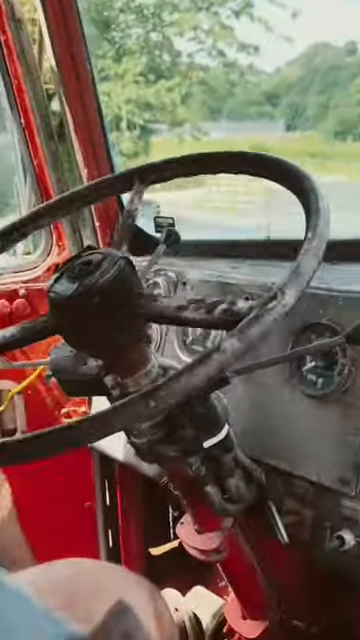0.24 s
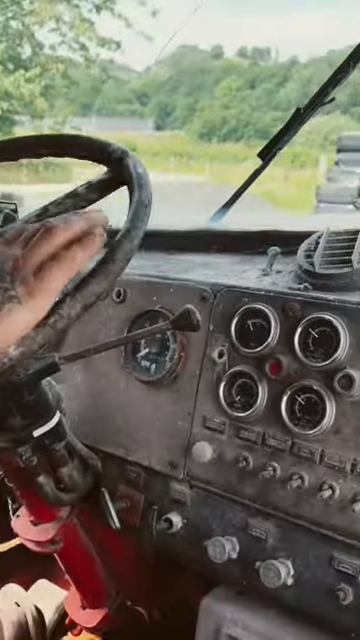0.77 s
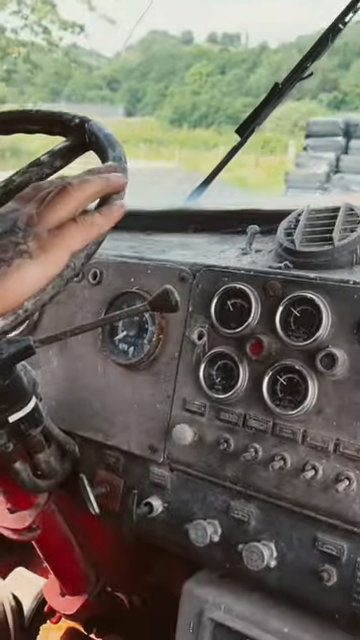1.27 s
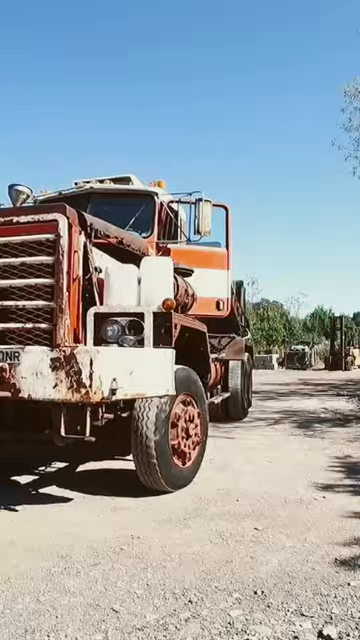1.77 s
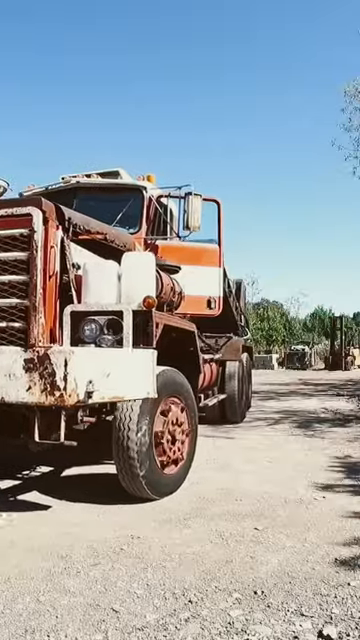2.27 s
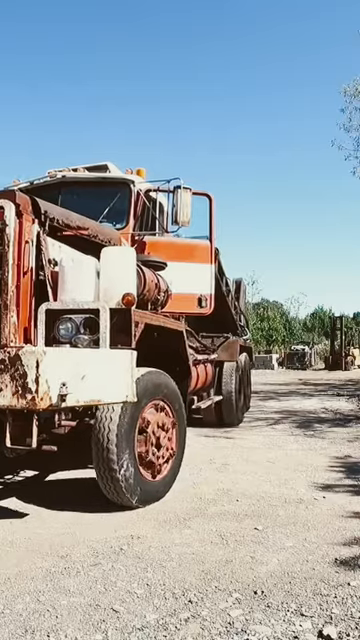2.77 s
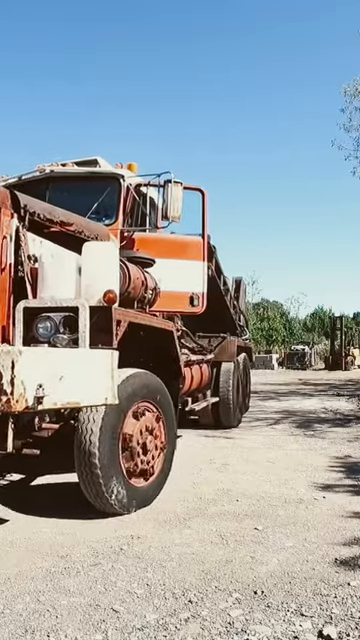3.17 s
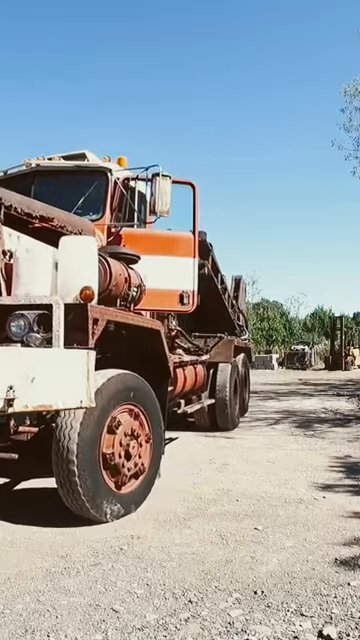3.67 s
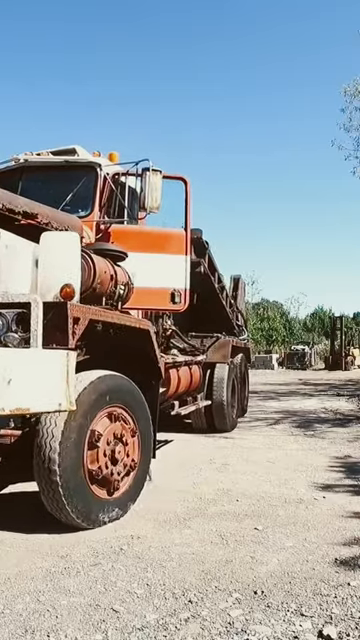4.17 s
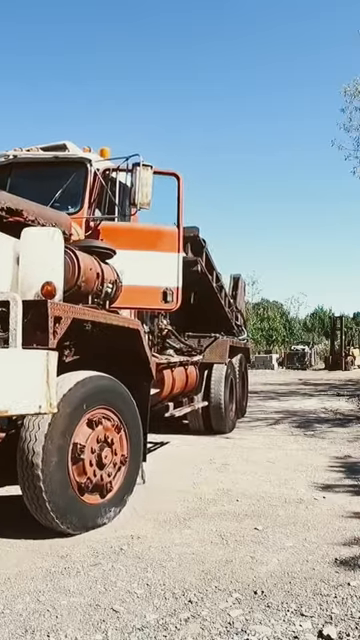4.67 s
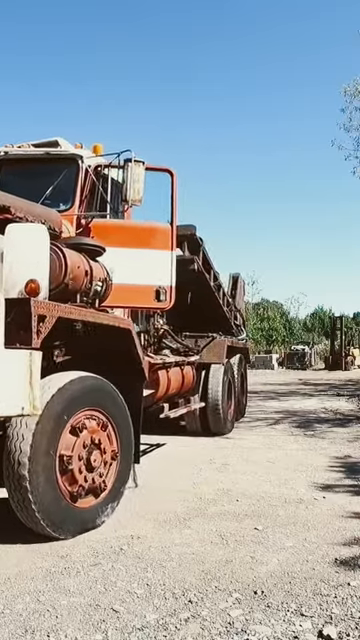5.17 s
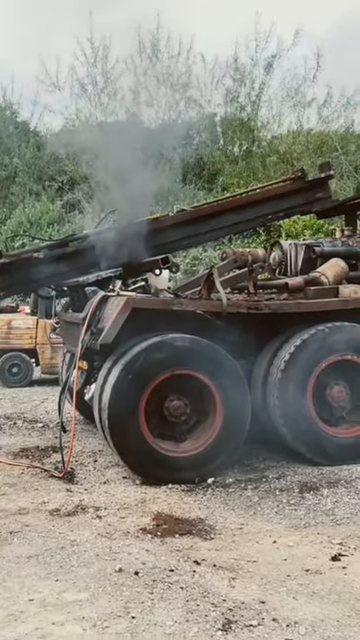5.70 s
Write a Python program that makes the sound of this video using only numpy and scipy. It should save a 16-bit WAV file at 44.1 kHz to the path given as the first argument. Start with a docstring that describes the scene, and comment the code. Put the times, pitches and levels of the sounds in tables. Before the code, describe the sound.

Booming diesel cab noise with thumping panels cuts to a clattering, whining truck engine outdoors that slows to a lumpy idle, then a faint distant idle.

```python
"""A six-cylinder drone sags and picks up in a truck cab while panels buzz, thump and clink.
Then a V8 runs at fast idle in the yard, gears whining, drops to slow idle, and is last heard faintly from behind.
Firing tones and cycle-locked noise bursts through resonances make the engines; gear whine is tones at multiples
of the cycle; loose parts are short decaying rings. All turning parts follow speed curves."""
import sys
import numpy as np
from scipy import signal
from scipy.fft import rfft, irfft
from scipy.io import wavfile
from scipy.ndimage import uniform_filter1d

SR = 44100
rng = np.random.default_rng(int(sys.argv[2]) if len(sys.argv) > 2 else 0)


def unload_audio(sound):
    """Save the sound as a 16-bit wav file, at the path given as the first command line argument."""
    columns = np.transpose(np.atleast_2d(sound))
    # keep every value between -1 and 1, then stretch to whole-number steps
    steps = np.round(np.clip(columns, -1, 1) * 32767)
    wavfile.write(sys.argv[1], SR, steps.astype(np.int16))


N = 261937
T = np.arange(N) / SR
HZ = np.fft.rfftfreq(N, 1 / SR)
YARD_START_S, YARD_END_S = 1.738, 5.312
EDGE_HZ = 15750  # upper band limit

# engine speed: (time [s], speed [rpm])
CAB_SPEED = [(0.0, 1659.5), (0.2, 1574.3), (0.4, 1436.0), (0.6, 1313.2), (0.75, 1268.1), (0.9, 1331.7),
             (1.05, 1463.6), (1.25, 1636.2), (1.45, 1694.8), (1.72, 1612.4)]
YARD_SPEED = [(1.75, 846), (2.1, 842), (2.45, 841), (2.7, 853), (3.0, 848), (3.3, 866), (3.5, 873),
              (4.06, 877), (4.2, 787), (4.33, 704), (4.5, 605), (4.72, 514), (4.9, 500), (5.3, 497)]

# spectra before scaling to rms 1: (frequency [Hz], relative level [dB per Hz])
CAB_CLATTER_SPECTRUM = [(260, -15), (450, -2), (667, -6), (850, -3), (1600, -6.5), (2120, -12), (3180, -18),
                        (3930, -22), (5000, -27.5), (6500, -60), (11000, -120)]
CAB_RATTLE_SPECTRUM = [(2820, -35), (4800, 6), (5220, 5), (7160, -0.5), (9870, -5.5), (11200, -3.5),
                       (12600, -9), (15600, -11)]
CAB_RUMBLE_SPECTRUM = [(30, -28), (60, -28), (85, -2.5), (108, 5.5), (122, 6), (136, -12.5), (160, 0),
                       (190, -7.5), (220, -17.5), (280, -17.5), (500, -32), (1500, -110)]
CAB_PANEL_SPECTRUM = [(120, -58), (200, -12.5), (270, -9.5), (330, 5), (400, 1.5), (460, -14.5), (650, -57),
                      (1500, -100)]
FAST_CLATTER_SPECTRUM = [(82, -61.5), (140, -2), (200, -11.5), (275, -8.5), (390, -9.5), (490, -14),
                         (680, -7.5), (900, -8), (1130, -2), (1410, -15.5), (1880, -12.5), (2470, -26.5),
                         (2850, -31), (3230, -22.5), (3650, -37), (4840, -40), (7700, -55.5), (10300, -64),
                         (17400, -120)]
SLOW_CLATTER_SPECTRUM = [(82, -54), (166, -4), (366, -7.5), (578, -9.5), (672, -8.5), (823, -4),
                         (1150, 0.5), (1440, -10.5), (2010, -12.5), (2420, -27), (3300, -28), (5700, -44.5),
                         (6350, -44), (7900, -55), (10300, -62.5), (17400, -120)]
TICKING_SPECTRUM = [(1500, -42.5), (2500, -4), (3250, -1), (4000, -8), (4950, -0.5), (5600, -10),
                    (7700, -14.5), (8300, -36.5), (13000, -59.5)]
PIPE_SPECTRUM = [(10, -20.5), (30, 5.5), (45, 10.5), (57, -4), (90, 4.5), (160, -8.5), (280, -7.5),
                 (600, -34.5), (1500, -80)]
REAR_SPECTRUM = [(15, -44), (25, -18), (71, 2), (200, -1), (462, -8.5), (856, -1.5), (1420, -9),
                 (2560, -22), (9770, -34.5), (11200, -33), (15000, -46)]
DIFFUSE_SPECTRUM = [(300, -55.5), (600, -1.0), (2000, -14.5), (5000, -24.5), (8000, -43.5)]

# small loose metal parts in the cab: (time [s], relative level [dB])
CAB_CLINKS = [(0.0882, -30), (0.1748, -23), (1.081, -31), (1.2406, -26)]
# loose cab panel: (time [s], envelope peak [dB])
PANEL_THUMPS = [(0.08, -14), (0.286, -10.5), (0.335, -17), (0.452, -20), (0.756, -14.5), (0.782, -11),
                (0.962, -15), (0.996, -10), (1.176, -20), (1.203, -10), (1.225, -13), (1.248, -12),
                (1.347, -10.5), (1.398, -7.5), (1.538, -14), (1.586, -11.5)]
# dash metal buzz: (time [s], half length [s], added drive level [dB])
DASH_SWELLS = [(0.08, 0.067, -38.5), (0.36, 0.021, -38), (1.155, 0.037, -38), (1.245, 0.018, -33),
               (1.441, 0.015, -30.5)]
# floor drumming at twice the firing rate: (time [s], half length [s], level [dB])
FLOOR_DRUMMING = [(0.118, .012, -20), (0.16, .016, -14), (0.348, 0.018, -17), (1.261, 0.03, -18),
                  (1.474, 0.0087, -16), (1.67, 0.02, -21.5)]
# cab gear whine: (time [s], relative level [dB])
CAB_WHINE_LEVEL = [(0, -25.5), (.12, -25.5), (.25, -32.5), (.4, -30), (.46, -47), (1.06, -35),
                   (1.14, -23.5), (1.25, -32.5), (1.46, -26), (1.59, -30.5), (1.66, -32)]
# short ringing bursts outside: (time [s], half length [s], pitch [Hz], level [dB])
RINGING_BURSTS = [(3.938, 0.0088, 4900, -46), (4.032, 0.0027, 1210, -25), (4.637, 0.0044, 905, -22),
                  (4.679, .005, 912, -24), (4.761, 0.0036, 920, -24), (4.787, 0.0043, 1990, -26.5),
                  (5.029, .005, 1060, -23), (5.061, 0.011, 1960, -29.5), (5.244, 0.014, 4900, -47),
                  (5.694, .003, 900, -52)]

# engine block and covers: (frequency [Hz], width [Hz], gain over the clatter [dB])
BLOCK_RINGS = [(263.5, 17, -10), (4720, 380, 4.5), (6900, 1600, -0.5)]
# V8 cylinders in firing order: (strength [dB], lag [share of firing interval])
CYLINDER_PUFFS = [(-3, 0.765), (2.5, 0.512), (2.5, 0.514), (0, 0.523), (0, 0.568), (-4.5, 0.46),
                  (1.5, 0.508), (2.5, 0.651)]
# gear mesh sidebands: (multiple of cycle [-], relative level at grille [dB], relative level beside wing [dB])
MESH_SIDEBANDS = [(146, -14, -9), (152, -1, -5), (156, -1, -10), (162, 2, -3), (164, 0, -12),
                  (166, -2, -12), (168, -3, 2), (172, -9, -11)]
# yard gear whine: (time [s], mesh tone level [dB], sideband level [dB])
YARD_WHINE_LEVEL = [(2.0, -30, -31), (2.17, -27.5, -29.5), (2.5, -28, -30.5), (2.75, -31.5, -30),
                    (3.2, -33, -27.5), (3.4, -23, -27.5), (3.62, -23.5, -29), (3.82, -27, -29),
                    (4.05, -28, -28.5), (4.27, -27, -35), (4.4, -33.5, -35), (4.6, -38.5, -36.5),
                    (4.73, -29, -44), (4.9, -34, -40)]
# fan, pump and belts at fast idle: (multiple of cycle [-], mean level [dB])
BELT_HUM = [(23, -44), (38, -46), (57, -47)]
# yard stereo level balance: (frequency [Hz], left minus right [dB])
STEREO_BALANCE = [(60, 0.5), (240, 1.5), (480, 3), (950, 6.5), (1890, 2), (3770, 6.5), (7520, -4.5)]
# yard stereo phase: (frequency [Hz], left lead over right [rad])
STEREO_LEAD = [(0, -0.0068), (1640, 0.11), (2670, -1.42), (3700, -0.74), (5430, 0.72), (10600, 0.2)]

# cab base levels: (dB at low speed, dB at high speed, dB added at full pull); DRONE is at high speed from the knee
BOOM, RUMBLE, PANELS = (-11.5, -13.5, 0), (-19.5, -17, 0), (-25.5, -21.5, 0)
CLATTER, RATTLE, DRONE = (-28.5, -25.5, 1), (-47, -43.5, 2), (-22.5, -13, 1.4)
LOW_RPM, KNEE_RPM, HIGH_RPM, FULL_PULL_RPM_PER_S = 1270, 1490, 1690, 900
SHUDDER_CYCLES, SHUDDER_FIRST = 2.614, 1.45  # engine cycles per shudder, cycles at the first
SHUDDER_DB, SHUDDER_WIDTH = 1.5, 0.37  # panel lift; half length as share of the beat
BOOM_SWING_DB, BOOM_LEAD = 1.5, 0.283  # boom swells ahead of the shudder (share of the beat)
SURGE_DB, SURGE_SWING_DB = -18, 8.5  # order 8, at high speed
THUMP_RISE_S, THUMP_HZ, THUMP_SPREAD = 0.0044, 364, 0.022
DASH_DB, DASH_HZ, DASH_PULL_HZ = -44, 3200, 246  # constant drive level; pitch, and its rise at full pull
CAB_OCTAVE_DB = -9  # relative to the mesh tone

PIPE_FAST_DB, PIPE_SLOW_DB, PIPE_DB_PER_S = -15.5, -21, -0.51  # base levels; fades along the walk
PIPE_DROP_RPM, PIPE_DROP_WIDTH_RPM = 702, 9.9  # below this the puffs stop driving the pipe hard
CLATTER_FAST_DB, CLATTER_SLOW_DB, CLATTER_COAST_DB = -35, -36, -2.5  # base levels; added at full slowing
CATCH_S, CATCH_HALF_S, CATCH_DB = 5.13, 0.28, 3.2  # clatter swells as the governor catches the idle
CATCH_THUD_DB = -30.5
COVER_HZ, COVER_WIDTH_HZ, COVER_DB, COVER_FROM_S = 911, 49, -35, 2.9
TICKING_DB, ARCH_S, ARCH_HALF_S, ARCH_DB = -51.5, 4, 0.35, 4.7  # ticking swells through the wheel arch
WING_S, WING_TURN_S = 3.02, 0.16  # the walk passes from grille to wing
CHATTER_WIDTH = 0.067  # ring width as share of pitch
REAR_DB = -55.5  # gain on the rear mix


def amp(db):
    """Decibels to gain."""
    return 10 ** (np.asarray(db) / 20)


def unit(x):
    """Scales to rms 1."""
    return x / np.sqrt(np.mean(x ** 2) + 1e-20)


def steady(x):
    """Scales to rms 1 over a sliding quarter second or so; the throb stays."""
    return x / np.sqrt(uniform_filter1d(x ** 2, size=12400) + 1e-12)


def curves(rows):
    """Interpolates each column over time."""
    s, *columns = np.transpose(rows)
    return [np.interp(T, s, c) for c in columns]


def read(points):
    """Interpolates a table over log frequency."""
    f, value = np.transpose(points)
    return np.interp(np.log(HZ + 1), np.log(f + 1), value)


def colour(x, points):
    """Filters x by a spectrum table, then scales to rms 1."""
    return unit(irfft(rfft(x) * amp(read(points)), N))


def resonate(x, hz, width):
    """Resonance of gain 1 at its centre, which may follow a curve."""
    turn = np.exp(2j * np.pi * np.cumsum(hz * np.ones(N)) / SR)
    r = np.exp(-np.pi * width / SR)
    return 2 * (turn * signal.lfilter([1 - r], [1, -r], x / turn)).real


def wander(hz):
    """Low-passed noise, rms 1."""
    lowpass = 1 + (np.fft.rfftfreq(8192, .001) / hz) ** 4
    slow = irfft(rfft(rng.standard_normal(size=8192)) / lowpass)
    return unit(np.interp(T * 1000, np.arange(len(slow)), slow))


def swell(at, half):
    """Gaussian bump of height 1; half is the time to 1/e."""
    return np.exp(-((T - at) / half) ** 2)


def section(start, end, fade_in, fade_out):
    """Opens and shuts one section with short fades."""
    return np.clip((T - start) / fade_in, 0, 1) * np.clip((end - T) / fade_out, 0, 1)


def crank(rpm):
    """Four-stroke cycles per second, and cycles turned so far."""
    rate = rpm / 120
    return rate, np.cumsum(rate) / SR


def speeding(rpm):
    """Smoothed speed change in rpm per second."""
    return uniform_filter1d(np.gradient(rpm, T), size=6000)


def follow(law, speed, pull):
    """Level in dB from speed and pull."""
    low_db, high_db, pull_db = law
    return low_db + (high_db - low_db) * speed + pull_db * pull


def tone(cycles, order, lag=0):
    """Sine at a multiple of the engine cycle, rms 1."""
    return np.sqrt(2) * np.cos(2 * np.pi * (order * cycles - lag))


def knocks(cycles, count, lag, decay, bed, repeat, spread_db, size=8192):
    """Decaying noise bursts, count a cycle; the power share 'repeat' is alike in every cycle."""
    same = rng.standard_normal(size=size)
    repeat = np.clip(repeat, 0, 1)
    repeated = np.sqrt(repeat) * same[(cycles % 1 * len(same)).astype(int)]
    noise = repeated + np.sqrt(1 - repeat) * rng.standard_normal(N)
    beat, age = np.divmod(count * cycles - lag + 2, 1)
    force = amp(spread_db * rng.standard_normal(size=1024))[beat.astype(int)]
    return unit(noise * (bed + force * np.exp(-age / decay)))


def rear():
    """Idle from far behind: dull clatter, soft firing tones and one ringing cover."""
    rate, cycles = crank(np.full(N, 480.))
    hits = knocks(cycles, count=8, lag=0.22, decay=0.61, bed=2.1, repeat=0.38, spread_db=2)
    firing = amp(-16) * tone(cycles, order=8) + amp(-14) * tone(cycles, order=16)
    cover = amp(-32) * unit(resonate(hits, 1000, 16))
    return amp(REAR_DB) * (amp(1.5) * colour(hits, REAR_SPECTRUM) + firing + cover)


def chatters():
    """Short noise bursts, each ringing at one pitch."""
    noise, out = rfft(rng.standard_normal(N)), np.zeros(N)
    for s, half, hz, db in RINGING_BURSTS:
        shape = swell(s, half)
        burst = shape * irfft(noise * np.exp(-((HZ / hz - 1) / CHATTER_WIDTH) ** 2), N)
        out += amp(db) * burst * np.linalg.norm(shape) / np.linalg.norm(burst)
    return out


def clinks():
    """Decaying noise in two resonances: small metal parts ring briefly."""
    blows = sum(amp(db - 15) * (T > s) * np.exp(-abs(T - s) / 0.014) for s, db in CAB_CLINKS)
    noise = rng.standard_normal(N)
    return blows * unit(resonate(resonate(noise, 7300, 2200), 9200, 5000))


def thumps():
    """Each blow rings the panel for a few cycles."""
    out = np.zeros(N)
    for s, db in PANEL_THUMPS:
        age = np.maximum(T - s, 0)
        hz = THUMP_HZ * (1 + THUMP_SPREAD * rng.standard_normal())
        envelope = age / THUMP_RISE_S * np.exp(1 - age / THUMP_RISE_S)
        out += amp(db) * envelope * np.sin(2 * np.pi * hz * age)
    return out


def singing(cycles, clatter_db):
    """High engine orders flare briefly in the clatter and glide with speed."""
    streaks = sum(amp(6 * wander(12)) / k * tone(cycles, order=k, lag=.2 * wander(20))
                  for k in range(98, 180, 7))
    return amp(clatter_db - 6.5) * steady(streaks)


def cab_gears(cycles):
    """A gear meshes 60 times a cycle; its ragged whine and octave glide with the engine."""
    level_db, = curves(CAB_WHINE_LEVEL)
    play = .13 * wander(18) + .09 * wander(70)
    levels_db = level_db, level_db + CAB_OCTAVE_DB
    return sum(amp(db - 2 + 3.8 * wander(30)) * tone(cycles, order=60 * k, lag=k * play)
               for k, db in enumerate(levels_db, 1))


def cab_boom(rate, cycles, boom_db, speed, swing):
    """Order 9 of the cycle booms near the cab's air resonance; order 8 surges at high speed."""
    near = 1 / np.hypot(1, (9 * rate - 101) / 14)
    boom_db = boom_db + BOOM_SWING_DB * swing - 1.5 + 0.85 * wander(54)
    boom = amp(boom_db) * near * tone(cycles, order=9, lag=0.004)
    surge = tone(cycles, order=8, lag=0.318 + 0.17 * wander(9.2))
    return boom + amp(SURGE_DB + SURGE_SWING_DB * swing) * speed * surge


def dash_metal(cycles, pull):
    """Engine-driven noise rings the dash metal, higher with pull."""
    buzz = knocks(cycles, count=3, lag=.6, decay=.4, bed=.9, repeat=.7, spread_db=2, size=2400)
    drive = amp(DASH_DB) + sum(amp(db) * swell(s, half) for s, half, db in DASH_SWELLS)
    hz = DASH_HZ + DASH_PULL_HZ * pull
    return drive * unit(resonate(resonate(buzz, hz, 300), hz, 700))


def cab():
    """Six firings a cycle drone; speed and pull set the levels, and panels shudder in a slow beat."""
    rpm, = curves(CAB_SPEED)
    rate, cycles = crank(rpm)
    pull = speeding(rpm) / FULL_PULL_RPM_PER_S
    speed = np.interp(rpm, [LOW_RPM, HIGH_RPM], [0, 1])
    to_knee = np.interp(rpm, [LOW_RPM, KNEE_RPM], [0, 1])
    boom_db, panel_db, clatter_db, rattle_db = (
        follow(law, speed, pull) for law in (BOOM, PANELS, CLATTER, RATTLE))
    beat = (cycles - SHUDDER_FIRST) / SHUDDER_CYCLES
    shudder = np.exp(-((beat - np.round(beat)) / SHUDDER_WIDTH) ** 2)
    swing = np.cos(2 * np.pi * (beat + BOOM_LEAD))
    drone_db = follow(DRONE, to_knee, pull) + 1.0 + 1.1 * wander(34)
    drone = amp(drone_db) * tone(cycles, order=6, lag=0.72)
    drumming = sum(amp(db) * swell(s, half) for s, half, db in FLOOR_DRUMMING) * tone(cycles, order=12)
    shake = knocks(cycles, count=6, lag=0.68, decay=0.44, bed=0.77, repeat=0.39, spread_db=1.5)
    rumble = amp(follow(RUMBLE, speed, pull)) * steady(colour(shake, CAB_RUMBLE_SPECTRUM))
    flutter = knocks(cycles, count=3, lag=0.27, decay=0.36, bed=0.34, repeat=0.6, spread_db=1.5, size=2400)
    panels = amp(panel_db - 1.5 + SHUDDER_DB * shudder) * colour(flutter, CAB_PANEL_SPECTRUM)
    # every other firing knocks harder through the bulkhead
    combustion = knocks(cycles, count=3, lag=.68, decay=.32, bed=1.25, repeat=.5, spread_db=1.2, size=2400)
    clatter = amp(clatter_db + 0.7 + 1.04 * wander(23)) * colour(combustion, CAB_CLATTER_SPECTRUM)
    fittings = knocks(cycles, count=3, lag=.7, decay=.28, bed=1.15, repeat=.35, spread_db=2, size=2800)
    rattle = amp(rattle_db + 1.0 * wander(29)) * colour(fittings, CAB_RATTLE_SPECTRUM)
    engine = drone + drumming + cab_boom(rate, cycles, boom_db, speed, swing) + rumble + clatter
    loose = panels + rattle + dash_metal(cycles, pull) + thumps() + clinks()
    return engine + loose + singing(cycles, clatter_db) + cab_gears(cycles)


def valves(cycles, coast):
    """Sixteen tappets a cycle tick unevenly, softer while the engine slows."""
    ticks = knocks(cycles, count=16, lag=.3, decay=.35, bed=.8, repeat=.6, spread_db=3)
    level_db = TICKING_DB + ARCH_DB * swell(ARCH_S, ARCH_HALF_S) + CLATTER_COAST_DB * coast
    return amp(level_db) * colour(ticks, TICKING_SPECTRUM)


def gears(rate, cycles, fast, coast):
    """Timing gears mesh 160 times a cycle; the crank's uneven pull spreads the whine into sidebands."""
    mesh_db, sidebands_db = curves(YARD_WHINE_LEVEL)
    slack = 1 - fast  # unloaded teeth hunt in their backlash
    hunting = slack * (.16 * (1 - .4 * coast) * wander(35) + .09 * tone(cycles, order=2))
    mesh = tone(cycles, order=160, lag=.05 * wander(14) + hunting)
    mesh = steady(mesh * amp((1 + 3 * slack * (1 - coast)) * wander(25)))
    wing = .5 + .5 * np.tanh((T - WING_S) / WING_TURN_S)
    lines = np.zeros(N)
    for k, front_db, side_db in MESH_SIDEBANDS:
        line_db = front_db + (side_db - front_db) * wing + 2 * wander(10)
        lines += amp(line_db) * tone(cycles, order=k, lag=rng.random() + .06 * wander(6))
    mesh_hz = 160 * rate
    teeth = knocks(cycles, count=2, lag=0.079, decay=0.62, bed=0.58, repeat=0.61, spread_db=3.0)
    chatter = steady(resonate(resonate(teeth, mesh_hz, 220), mesh_hz, 300))
    whine = amp(mesh_db) * mesh + amp(sidebands_db) * (steady(lines) + amp(-6.5) * chatter)
    # unloaded teeth rattle; overtones sound as they cross the gear cover's resonance
    second = amp(-32.0) * coast * np.sqrt(slack) * tone(cycles, order=320, lag=.1 * wander(45))
    third_level = amp(-41.0) * slack ** 4 * amp(2 * wander(24))
    third = third_level * tone(cycles, order=480, lag=0.15 * wander(51))
    overtones = resonate(resonate(second + third, 2070, 750), 1920, 1200)
    return whine + overtones


def belts(cycles, fast):
    """Fan, pump and belts hum at fixed multiples of the cycle, fading as the engine slows."""
    return fast ** 3 * sum(amp(db + 5.8 * wander(0.89)) * tone(cycles, order=k, lag=0.21 * wander(10))
                           for k, db in BELT_HUM)


def exhaust(rate, cycles, pipe_db, fast, coast):
    """Eight uneven puffs a cycle ring the pipe; its pitch rises with engine speed as the gas gets hotter."""
    puffs = np.zeros(N)
    for k, (db, lag) in enumerate(CYLINDER_PUFFS):
        turns = np.floor(cycles - (k + lag) / len(CYLINDER_PUFFS))
        puffs += amp(db) * (np.diff(turns, prepend=0) > 0)
    puffs = colour(puffs * amp(0.6 * wander(30)), PIPE_SPECTRUM)
    pipe = resonate(puffs, 114 * (rate / rate.max()) ** 0.13, 21.3)
    # the thud fades while fuel is cut; an octave joins as the governor catches the idle
    thud_db = -25.5 - 4.4 * (0.5 - fast) - 4.4 * coast + 0.5 * wander(15)
    thud = amp(thud_db) * tone(cycles, order=8, lag=0.064)
    octave = amp(CATCH_THUD_DB) * swell(CATCH_S, CATCH_HALF_S) * tone(cycles, order=16)
    return amp(pipe_db - 1.0) * steady(pipe) + thud + octave


def yard(loose):
    """V8 exhaust, gears and combustion clatter, mostly stronger at left; speed drives the levels."""
    rpm, = curves(YARD_SPEED)
    rate, cycles = crank(rpm)
    coast = np.clip(-speeding(rpm) / 550, 0, 1)  # how hard the engine is slowing
    fast = np.clip((rpm - 500) / 340, 0, 1)
    driven = .5 + .5 * np.tanh((rpm - PIPE_DROP_RPM) / PIPE_DROP_WIDTH_RPM)
    pipe_db = PIPE_FAST_DB * driven + PIPE_SLOW_DB * (1 - driven) + PIPE_DB_PER_S * (T - YARD_START_S)
    clatter_db = CLATTER_FAST_DB * fast + CLATTER_SLOW_DB * (1 - fast) + CLATTER_COAST_DB * coast
    clatter_db = clatter_db + CATCH_DB * swell(CATCH_S, CATCH_HALF_S)
    hits = knocks(cycles, count=8, lag=.2, decay=.45, bed=1.7, repeat=.65, spread_db=2)
    hits = hits * amp(0.46 * tone(cycles, order=2, lag=0.58))  # swells once per crank turn
    # a side cover rings once the wheel arch is in line
    ring = steady(resonate(resonate(hits, COVER_HZ, COVER_WIDTH_HZ), COVER_HZ, 97))
    cover = amp(COVER_DB) * np.clip((T - COVER_FROM_S) / 0.045, 0, 1) * ring
    hits = hits + sum(amp(db) * resonate(hits, hz, width) for hz, width, db in BLOCK_RINGS)
    fast_clatter = amp(9.5) * np.sqrt(fast) * colour(hits, FAST_CLATTER_SPECTRUM)
    slow_clatter = amp(8.0) * np.sqrt(1 - fast) * colour(hits, SLOW_CLATTER_SPECTRUM)
    engine = amp(clatter_db) * (fast_clatter + slow_clatter) + cover + valves(cycles, coast)
    engine = engine + gears(rate, cycles, fast, coast) + belts(cycles, fast) + loose
    sound = rfft(engine + exhaust(rate, cycles, pipe_db, fast, coast))
    side = amp(read(STEREO_BALANCE) / 2) * np.exp(.5j * read(STEREO_LEAD))
    # diffuse noise that widens the clatter, opposite in sign at left and right
    diffuse = amp(clatter_db - 12.0) * colour(rng.standard_normal(N), DIFFUSE_SPECTRUM)
    return irfft(np.array([sound * side, sound / side]), N) + np.array([diffuse, -diffuse])


def scene():
    """Cab, yard, rear, one after the other."""
    inside = cab() * section(-1, YARD_START_S, .01, 0.039) ** 0.82
    loose = chatters()
    outside = yard(loose) * section(YARD_START_S, YARD_END_S, 0.04, 0.038) ** 1.28
    behind = (rear() + loose) * section(YARD_END_S, 7, 0.029, .01)
    return inside + outside + behind


def record(dry):
    """Rounds peaks off below full scale, then limits the band."""
    rounded = dry / (1 + abs(dry / .98) ** 8) ** (1 / 8)
    lowpass = signal.firwin(511, EDGE_HZ, window=("kaiser", 9), fs=SR)
    return signal.oaconvolve(rounded, lowpass[None], "same")


dry = scene()
out = record(dry)
unload_audio(out)
```